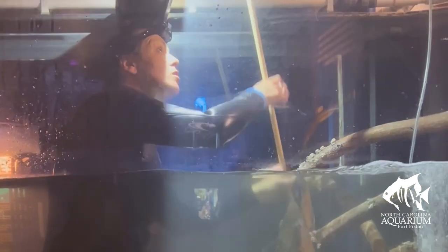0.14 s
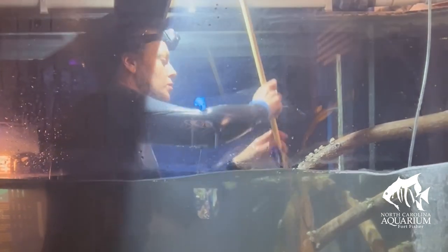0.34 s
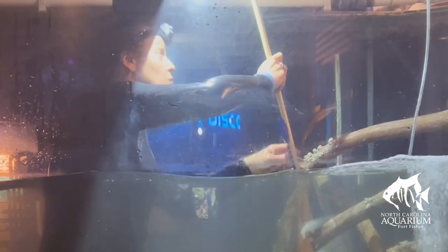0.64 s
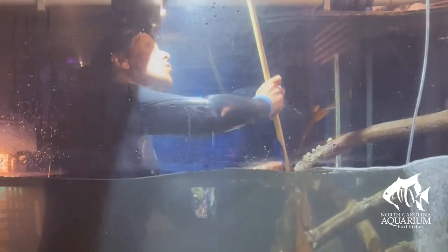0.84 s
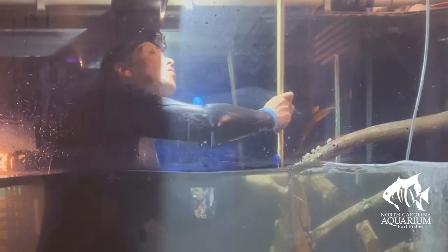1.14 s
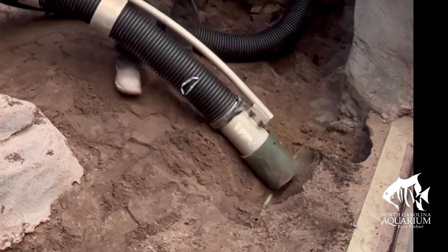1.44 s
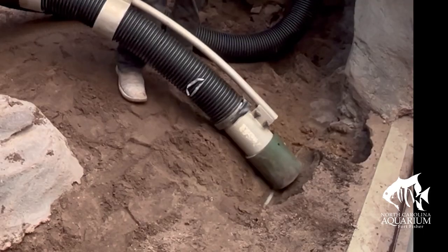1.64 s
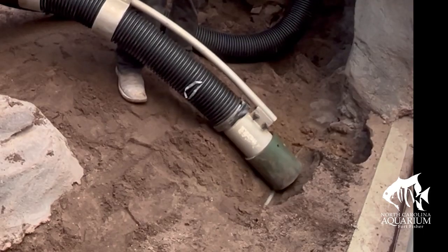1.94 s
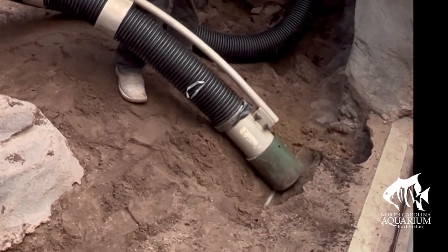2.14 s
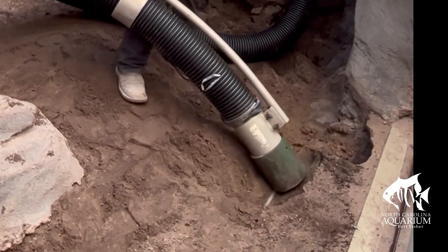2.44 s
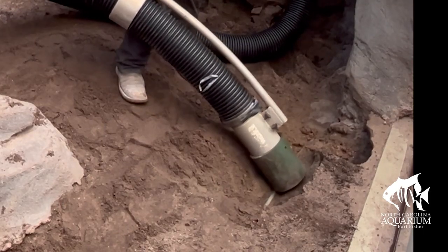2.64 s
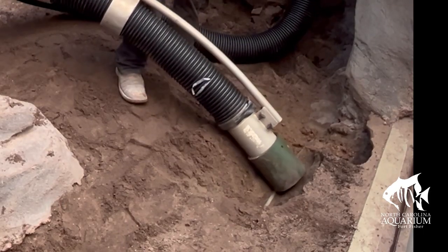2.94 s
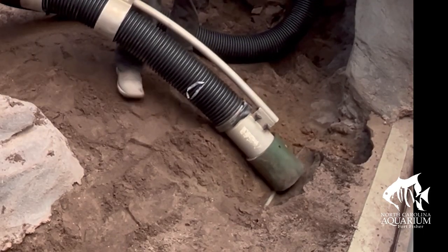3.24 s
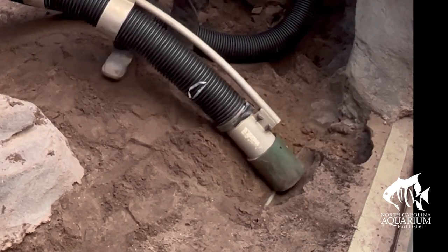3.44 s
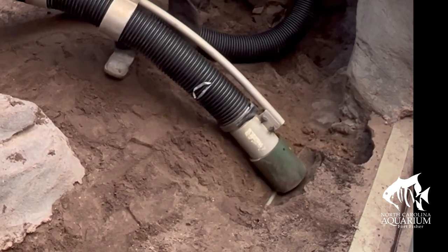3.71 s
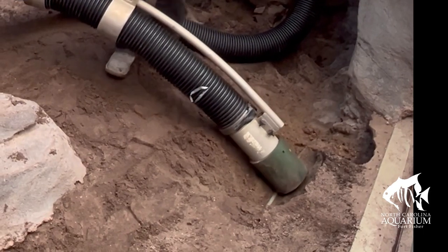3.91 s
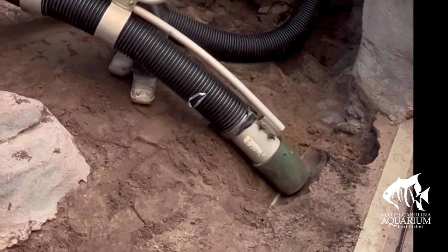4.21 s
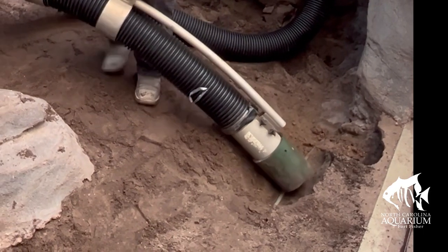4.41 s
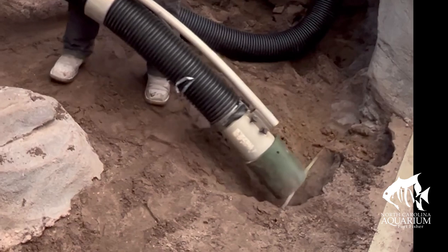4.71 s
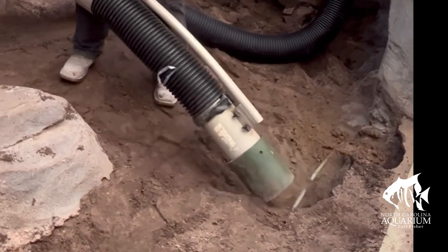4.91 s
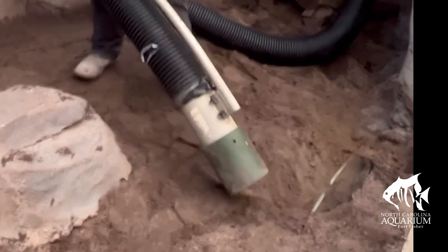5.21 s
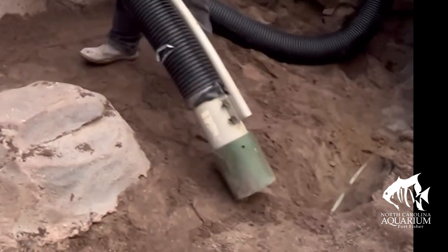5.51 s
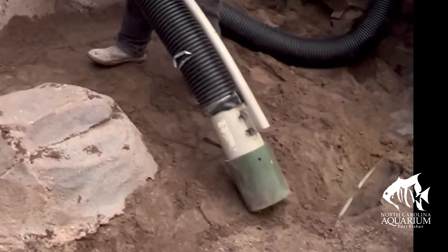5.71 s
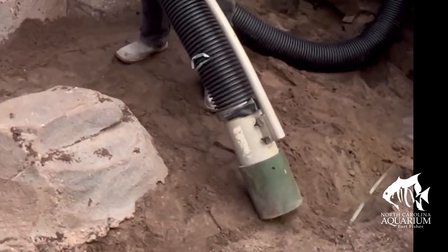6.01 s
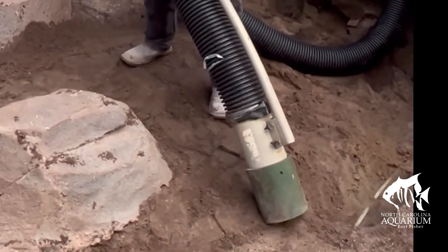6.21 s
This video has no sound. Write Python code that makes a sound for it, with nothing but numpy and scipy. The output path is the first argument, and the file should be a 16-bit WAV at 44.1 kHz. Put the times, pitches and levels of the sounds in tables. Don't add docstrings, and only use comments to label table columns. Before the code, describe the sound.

First, low pump drone and pipe resonance in a reflective indoor hall, with high insect buzzes, a falling then rising bird whistle and tiny chips. A sudden hard cut brings a much louder, broad rush of air into a hose nozzle at arm's length, steady low motor hum beneath, sand hissing, stones cracking against plastic. Late on, the nozzle comes free and the rush becomes brighter, more open and hollow.

```python
import sys
import numpy as np
from scipy import signal
from scipy.io import wavfile
from scipy.ndimage import uniform_filter1d

SR = 44100
rng = np.random.default_rng(int(sys.argv[2]) if len(sys.argv) > 2 else 0)


def volts_from_decibels(level):
    exponent = np.asarray(level, float) / 20
    return 10 ** exponent


def generate_wav(sig):
    pcm = np.round(np.clip(np.atleast_2d(sig).T, -1, 1) * 32767).astype(np.int16)
    wavfile.write(sys.argv[1], SR, pcm)


N = 280035
CUT_S = 1.2985
FRAME = 2048
HZ = np.fft.rfftfreq(FRAME, 1 / SR)

# [f/Hz, level/dB per Hz]
HALL_AIR = [(25, -80), (42, -68), (60, -62), (200, -64.5), (400, -70.5), (1000, -78.5), (2000, -84.5),
            (3500, -87), (5000, -83), (7000, -98), (10000, -101), (15500, -109)]
# [f/Hz, width/Hz, level/dB]
PIPE_RINGS = [(165, 12, -62), (235, 5.8, -51.5), (335.4, 8, -46), (453, 17, -74), (612, 14, -60.5),
              (900, 21, -59)]
# [f/Hz, level/dB]
PUMP_TONES = [(55.5, -37), (119.8, -39)]
# [rate/Hz, loudest t/s, depth/0-1]
SHAFT_BEATS = [(1.9, 0.626, 0.6), (1.1, 0.66, 0.17)]
MAINS_BEATS = [(8.7, 0.396, 0.36), (4.3, 0.39, 0.33)]
# [f/Hz, width/Hz, level/dB]
INSECT_WINGS = [(4960, 200, 0), (4450, 120, -10)]
# [start t/s, hold/s, chorus level/dB]
TRILLS = [
    (0.136, 0.22, -46),
    (.43, 0.055, -49),
    (1.0, .3, -47.5),
]
TRILL_RISE_DB_PER_S, TRILL_FALL_DB_PER_S = 250, 80
# [start t/s, length/s, from f/Hz, to f/Hz, level/dB]
BIRD_NOTES = [
    (.174, .022, 9000, 8700, -61),
    (.184, .05, 9200, 5700, -50.5),
    (.23, .05, 5100, 3650, -49),
    (.248, .06, 3100, 2680, -58),
    (.336, .09, 3250, 3400, -54),
    (.342, .082, 3500, 4110, -43.5),
    (.455, .06, 4050, 3650, -54),
]
GLIDE, NOTE_RISE_S, NOTE_FADE_DB = .2, .006, -6
# [t/s, peak level/dB, f/Hz]
CHIPS = [
    (.4645, -42.5, 7800),
    (.471, -50, 8500),
    (1.074, -53, 8200),
]
# [t/s, level/dB, half length/s]
FLICKS = [
    (.48, -56, .012),
    (1.095, -62, .018),
]
# [f/Hz, T60/s]
HALL_T60 = [(2000, .6), (5000, .5), (10000, .3)]

# [f/Hz, level/dB per Hz]
RUSH = [(25, -96), (60, -60.5), (140, -64), (300, -59.5), (700, -59.5), (1300, -61.5), (2100, -63),
        (3000, -57.5), (4000, -64.5), (5000, -66), (6000, -70), (10000, -75.5), (15500, -77)]
# [f/Hz, width/Hz, buried level/dB, lifted level/dB]
STANDING_WAVES = [(174, 30, 1.5, 9.5), (232, 46, 4, -7), (356, 33, 0, 5), (427, 39, -9, -19),
                  (469, 74, 4, 3.5), (600, 38, -3.5, -12), (644, 36, 4, 8.5), (807, 27, -1, 8.5),
                  (964, 61, 2.5, 6), (1170, 120, 1, 4.5), (1940, 170, 2.5, -0.5), (2330, 100, -1, 3.5),
                  (2540, 77, 4, 3), (3040, 174, 3, 5.5), (3550, 420, 2, -0.5), (4670, 430, 0.5, 1)]
# [t/s, lift/0-1]
LIFT = [
    (4.6, 0),
    (4.85, 0.32),
    (5.25, 0.76),
    (6.35, 1),
]
# [t/s, level/dB over the buried flow]
DRAUGHT = [(1.3, .1), (1.45, -0.5), (2.05, 0.3), (2.4, 1), (2.65, 1.1), (2.9, -0.6), (4.1, -0.3),
           (4.5, 0.9), (4.95, 3.5), (5.2, 4.5), (5.35, 4.2), (5.5, 5), (5.75, 3), (5.95, 3.5), (6.35, 2.5)]
# mouth roar, edge whistle, throat hiss, fizz [f/Hz]
FLOW_HZ = (900, 2900, 4800, 8000)
# resting level [level/dB], share of the draught [dB/dB], change when lifted [level/dB]
FLOW_DB = (-.8, 0.032, -0.8, -0.77)
FOLLOWS_DRAUGHT = (0.12, 0.98, 0.87, 0.59)
LIFT_DB = (3.5, -0.1, -0.4, -1)
# [t/s, half length/s, f/Hz, level/dB]
RIM_WHISTLES = [(1.58, 0.14, 3040, 5), (2.758, .33, 3060, 5.5), (2.751, 0.62, 1960, 8.5),
                (2.95, 0.29, 520, 6), (3.505, 0.11, 2400, 12), (3.989, 0.16, 3100, 4),
                (4.103, 0.89, 1660, 3), (4.11, 0.44, 716, 3), (4.75, 0.14, 950, 8), (4.91, 0.048, 2640, 11),
                (5.247, 0.11, 2610, 9), (5.715, 0.071, 2850, 7), (6.05, .3, 2250, 5.5),
                (6.102, 0.36, 830, 3)]
RIM_WIDTH_HZ = 65
# [t/s, half length/s, level/dB]
CHOKES = [
    (1.66, 0.095, -2.5),
    (2.47, 0.1, -1.5),
    (2.69, 0.067, -1.5),
    (3.68, 0.12, -1),
    (4.626, 0.16, -4),
    (4.95, 0.22, -1.5),
    (6.035, 0.093, -0.7),
]
CHOKE_HZ, CHOKE_WIDTH_HZ = 850, 860
# [t/s, half length/s, centre f/Hz, level/dB]
SLUGS = [(2.275, 0.023, 7200, 1.5), (2.604, 0.011, 900, 8.5), (2.613, .03, 8050, 1.5),
         (2.755, 0.018, 6500, 1.5), (3.524, .02, 1000, 6), (4.398, 0.013, 4500, 3.5),
         (4.88, 0.25, 3600, 0.5), (5.34, 0.036, 1000, 3), (5.463, 0.19, 1000, 2), (5.81, 0.03, 900, 0.5),
         (5.2, 0.13, 7500, 1.5), (5.866, .05, 6000, 0.5), (6.1, .15, 2200, 0.5)]
SLUG_SPREAD = 0.75
# [t/s, dull crack level/dB, bright tick level/dB]
PEBBLES = [(1.3561, -23, -45), (1.556, -31, -34.5), (1.764, -34.5, -35), (1.958, -32, -31),
           (2.2004, -36, -35), (2.2598, -35, -34), (2.277, -26, -40.5), (2.6023, -37, -23.5),
           (2.646, -19, -46), (2.7457, -17.5, -37.5), (3.5738, -23, -40), (3.833, -22, -38),
           (4.1574, -39, -33), (4.39, -30, -32), (4.394, -31, -31), (4.529, -37, -33.5), (5.418, -28, -32),
           (5.6314, -39, -36), (5.885, -19, -34), (5.966, -28, -38.5)]
BLOWER_HZ, BLOWER_DB, OCTAVE_DB, BLOWER_SAG_DB_PER_S = 100.05, -29, -39, 0.4

# [f/Hz, likeness/0-1, right leads/rad, left minus right level/dB]
PORTS_HALL = [(60, 1, 0, 0), (200, 0.98, 0, -1), (450, 0.95, 0.8, -1), (1000, 0.45, 0.1, -2.5),
              (2000, .85, 0, 0), (2500, 0.55, -2.5, 0), (3450, 0.96, -1.5, -0.5), (4500, 0.4, -2, -3),
              (5400, 0.4, -3, -4)]
PORTS_HOSE = [(60, 0.92, 0, 1), (199, 1, 0.5, -1.5), (597, 0.68, 0.15, 7.5), (800, 0.7, 1, 11),
              (950, 0.52, 0.5, 10), (1430, 0.8, 0.82, 5), (1970, 0.98, -0.5, 2.5), (2360, 0.46, -1.4, -3.5),
              (2400, 0.29, 2.5, -0.5), (3100, 0.62, 2.5, 1), (4000, 0.39, 2, 0), (4300, 0.3, 4, -2),
              (4800, 0.39, 0, -3.5), (5400, 0.14, -2.1, -2)]
TREBLE_HZ, IN_STEP_HZ, TURN_HZ = 5700, 8150, 4520


def evened(x):
    return x / np.sqrt(np.mean(x ** 2) + 1e-20)


def curve(rows, t):
    s, values = np.transpose(rows)
    return np.interp(t, s, values)


def by_hz(rows):
    f, *columns = np.transpose(rows)
    return [np.interp(np.log(HZ + 1), np.log(f + 1), c)[:, None] for c in columns]


def frames(x):
    return signal.stft(x, SR, nperseg=FRAME, noverlap=FRAME * 3 // 4)[1:]


def unframe(z):
    return signal.istft(z, SR, nperseg=FRAME, noverlap=FRAME * 3 // 4)[1][..., :N]


def resonate(x, hz, width):
    turn = np.exp(2j * np.pi * hz * np.arange(x.shape[-1]) / SR)
    r = np.exp(-np.pi * width / SR)
    return 2 * (turn * signal.lfilter([1 - r], [1, -r], x / turn)).real


def waver(rate):
    low = signal.butter(2, rate, fs=SR, output="sos")
    return evened(signal.sosfilt(low, rng.standard_normal(N)))


def ports(pair, table, lean=0.72):
    near, other = pair
    same, lead, balance_db = by_hz(table)
    last_hz = table[-1][0]
    treble = np.clip((HZ[:, None] - last_hz) / (TREBLE_HZ - last_hz), 0, 1)
    same = np.clip(same + treble * (1 - same), 0, 1)
    delay = 2 * np.pi * (IN_STEP_HZ - HZ[:, None]) / TURN_HZ
    lead = np.where(treble > .5, delay, lead)
    half_db = balance_db * (1 - treble) * lean / 2
    right = same * np.exp(1j * lead) * near + np.sqrt(1 - same ** 2) * other
    return unframe(np.array([near * volts_from_decibels(half_db), right * volts_from_decibels(-half_db)]))


def pumps(t):
    out = np.zeros((2, N))
    for (hz, db), beats in zip(PUMP_TONES, (SHAFT_BEATS, MAINS_BEATS)):
        turns = np.cumsum(hz * (1 + 0.019 * waver(3.9))) / SR
        throb = 1 + sum(depth * np.cos(2 * np.pi * rate * (t - s)) for rate, s, depth in beats)
        out += volts_from_decibels(db) * np.sqrt(2) * np.sin(2 * np.pi * turns) * throb
    noise = rng.standard_normal((2, N))
    for hz, width, db in PIPE_RINGS:
        out += volts_from_decibels(db) * evened(resonate(noise, hz, width))
    return out


def insects(t):
    noise = rng.standard_normal((2, N)) * volts_from_decibels(1.3 * waver(40))
    wings = 0
    for hz, width, db in INSECT_WINGS:
        wings = wings + volts_from_decibels(db) * evened(resonate(resonate(noise, hz, width), hz, width))
    swells = []
    for s, hold, db in TRILLS:
        rise_db = TRILL_RISE_DB_PER_S * np.maximum(s - t, 0)
        fall_db = TRILL_FALL_DB_PER_S * np.maximum(t - s - hold, 0)
        swells.append(volts_from_decibels(db - rise_db - fall_db))
    return wings * np.max(swells, axis=0)


def bird_note(t, flutter, s, length, from_hz, to_hz, db):
    u = np.clip(t - s, 0, length)
    hz = to_hz + (from_hz - to_hz) * np.exp(-u / (GLIDE * length))
    turns = np.cumsum(hz * flutter) / SR
    ramps = np.minimum(np.minimum(u, length - u) / NOTE_RISE_S, 1)
    return volts_from_decibels(db + NOTE_FADE_DB * (u / length) ** 3) * ramps * np.sin(2 * np.pi * turns)


def echoes(x):
    shape = (2, SR // 2)
    taps = rng.choice([-1., 1.], shape) * (rng.random(shape) < .08)
    hz, t, z = signal.stft(taps, SR, nperseg=256)
    f, t60 = np.transpose(HALL_T60)
    decay_db = -60 * t / np.interp(hz, f, t60)[:, None]
    tail = signal.istft(z * volts_from_decibels(decay_db), SR, nperseg=256)[1]
    return signal.fftconvolve(x[None], tail / np.linalg.norm(tail[0]), axes=1)[:, :N]


def bird(t):
    flutter = 1 + .014 * np.sin(2 * np.pi * 135 * t) + .005 * waver(300)
    hoarse = volts_from_decibels(3 * waver(120))
    call = hoarse * sum(bird_note(t, flutter, *row) for row in BIRD_NOTES)
    close = np.zeros(N)
    for s, db, hz in CHIPS:
        close += volts_from_decibels(db) * np.exp(-((t - s) / .0012) ** 2) * np.sin(2 * np.pi * hz * t)
    hiss = resonate(rng.standard_normal(N), 7500, 9000)
    for s, db, half in FLICKS:
        close += volts_from_decibels(db) * np.exp(-((t - s) / half) ** 2) * hiss
    wet = volts_from_decibels(3) * echoes(call + close / 2)
    return volts_from_decibels(5.5) * (call + close + wet)


def hall(t):
    noise = frames(rng.standard_normal((2, N)))[1]
    wash = unframe(noise * np.sqrt(SR / 2) * volts_from_decibels(by_hz(HALL_AIR)[0]))
    return ports(frames(wash + pumps(t) + insects(t) + bird(t))[1], PORTS_HALL)


def grit():
    size = volts_from_decibels(5.5 * np.minimum(rng.exponential(1, N), 5))
    grains = size * (rng.random(N) < 400 / SR) * rng.choice([-1, 1], N)
    cracks, ticks = np.zeros(N), volts_from_decibels(-8.5) * evened(grains)
    u = np.arange(400) / SR
    decay = np.exp(-u / 0.00051) + 0.13 * np.exp(-u / 0.0038)
    for s, dull_db, bright_db in PEBBLES:
        spray = rng.standard_normal(len(u)) * decay
        start = round(s * SR)
        cracks[start:][:len(u)] += volts_from_decibels(dull_db + 40) * spray
        ticks[start:][:len(u)] += volts_from_decibels(bright_db + 51) * spray
    dull = signal.butter(3, (6000, 10500), "band", fs=SR, output="sos")
    bright = signal.butter(2, 9000, "high", fs=SR, output="sos")
    return signal.sosfilt(dull, cracks) + signal.sosfilt(bright, ticks)


def patches(shape, bins, hops):
    field = uniform_filter1d(rng.standard_normal(shape), size=bins, axis=-2)
    return evened(uniform_filter1d(field, size=hops, axis=-1))


def spell(t, at, half):
    return np.exp(-((t - at) / half) ** 4)


def bump(hz, width, power=2):
    return 1 / (1 + (2 * (HZ[:, None] - hz) / width) ** power)


def nozzle_db(s, lifted):
    flow_db = np.array(FLOW_DB)[:, None] + np.outer(FOLLOWS_DRAUGHT, curve(DRAUGHT, s))
    flow_db = flow_db + np.outer(LIFT_DB, lifted)
    anchors = np.log((380,) + tuple(FLOW_HZ))
    shares = np.array([np.interp(np.log(HZ + 1), anchors, row) for row in np.eye(len(anchors))[1:]])
    field_db = by_hz(RUSH)[0] + shares.T @ flow_db
    for hz, width, buried_db, lifted_db in STANDING_WAVES:
        field_db += (buried_db + lifted * (lifted_db - buried_db)) * bump(hz, width)
    for at, half, db in CHOKES:
        field_db += db * spell(s, at, half) * bump(CHOKE_HZ, CHOKE_WIDTH_HZ, 4)
    for at, half, hz, db in RIM_WHISTLES:
        field_db += db * spell(s, at, half) * bump(hz, RIM_WIDTH_HZ)
    for at, half, hz, db in SLUGS:
        field_db += db * spell(s, at, half) * bump(hz, SLUG_SPREAD * hz)
    above_bass = shares.sum(0)[:, None]
    field_db += .8 * patches(field_db.shape, 16, 6) * above_bass
    ridges = patches(field_db.shape, 2, 40) / (1 + (HZ[:, None] / 6000) ** 4)
    return field_db + 2.77 * ridges * above_bass


def blower(t):
    hum_db = BLOWER_DB - BLOWER_SAG_DB_PER_S * (t - CUT_S) + .4 * waver(1)
    octave_db = OCTAVE_DB + 1.9 * waver(3.8)
    turn = 2 * np.pi * BLOWER_HZ * t
    return np.sqrt(2) * (volts_from_decibels(hum_db) * np.sin(turn) + volts_from_decibels(octave_db) * np.sin(2 * turn))


def hose(t):
    s, z = frames(rng.standard_normal((2, N)) + grit())
    lifted = np.clip(curve(LIFT, s), 0, 1)
    rush = z * np.sqrt(SR / 2) * volts_from_decibels(nozzle_db(s, lifted))
    return ports(rush, PORTS_HOSE, 1 + 0.32 * lifted) + blower(t)


def scene():
    t = np.arange(N) / SR
    return np.where(t < CUT_S, hall(t), hose(t))


def roll_off(x):
    return signal.sosfilt(signal.butter(12, 15800, fs=SR, output="sos"), x)


def record(dry):
    edge = signal.firwin(401, 15800, window=("kaiser", 9), fs=SR)
    mix = signal.oaconvolve(dry, edge[None], "same", axes=1)
    return roll_off(mix)


dry = scene()
out = record(dry)
generate_wav(out)
```